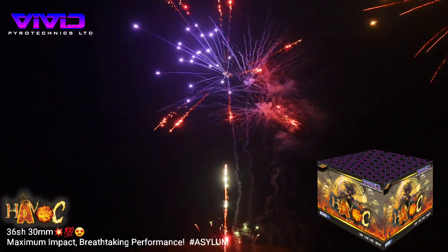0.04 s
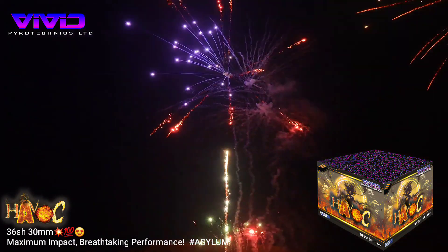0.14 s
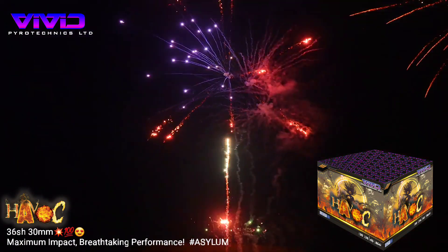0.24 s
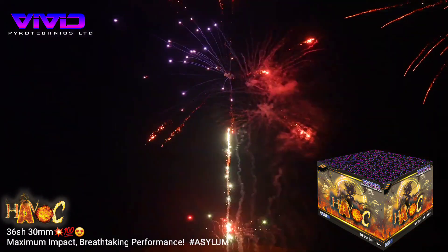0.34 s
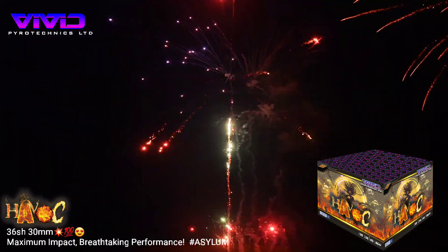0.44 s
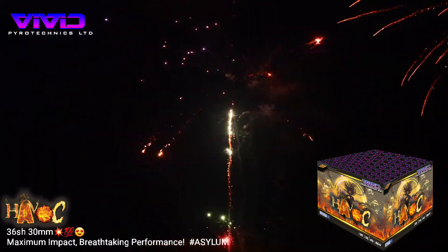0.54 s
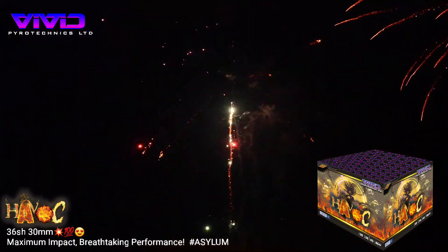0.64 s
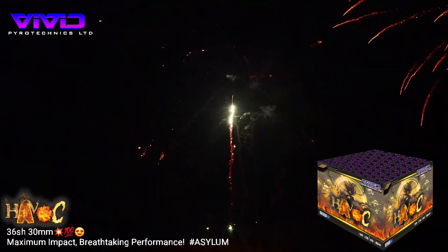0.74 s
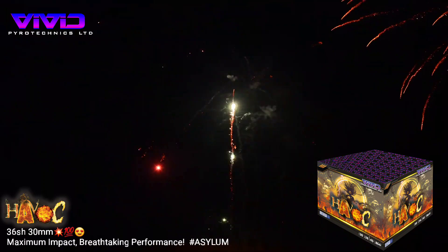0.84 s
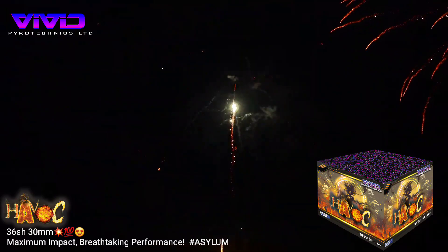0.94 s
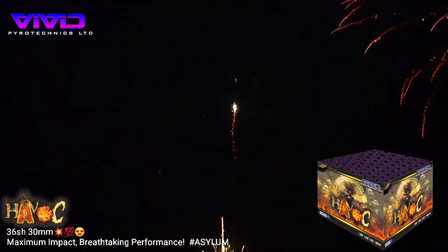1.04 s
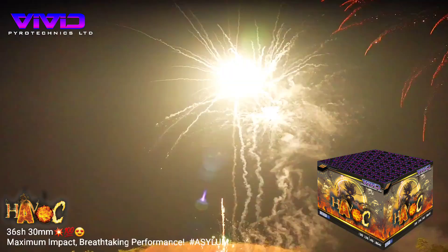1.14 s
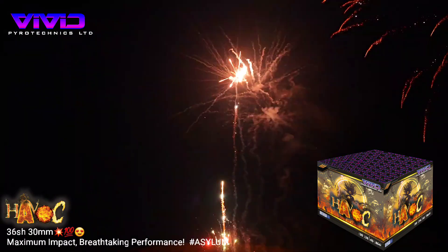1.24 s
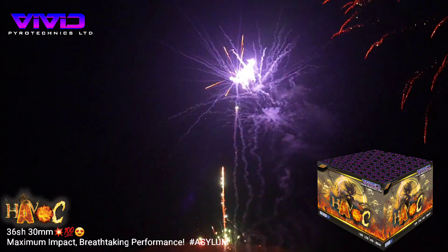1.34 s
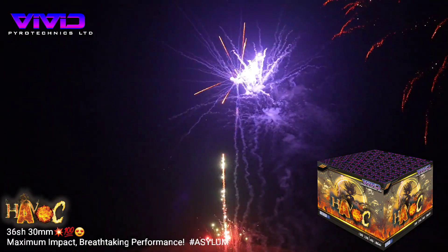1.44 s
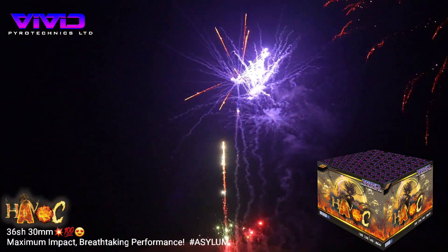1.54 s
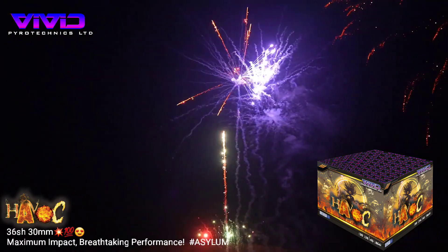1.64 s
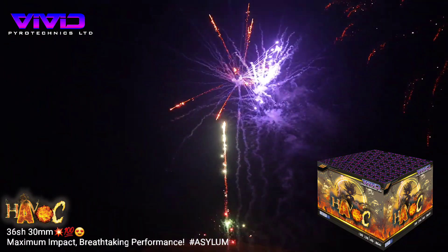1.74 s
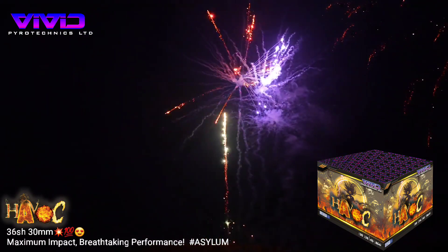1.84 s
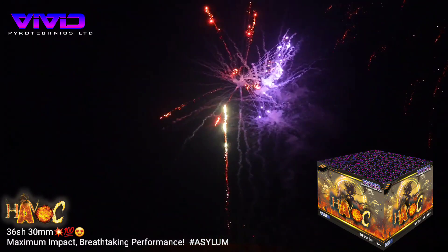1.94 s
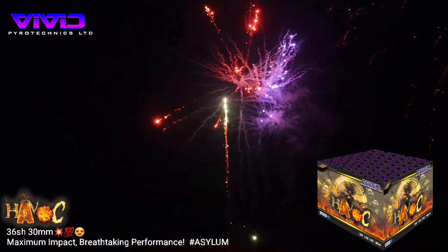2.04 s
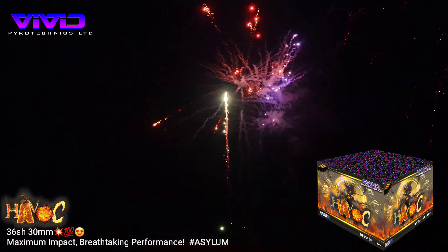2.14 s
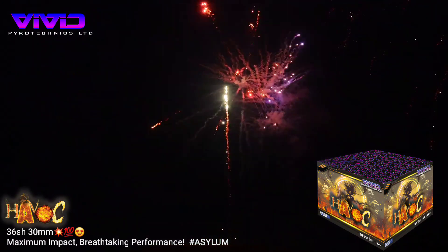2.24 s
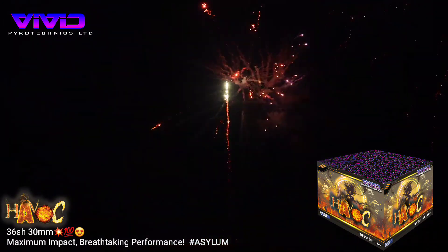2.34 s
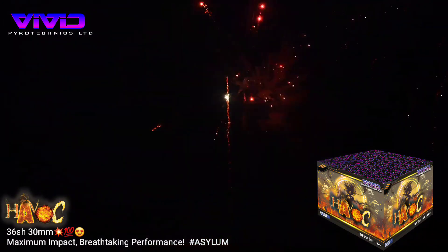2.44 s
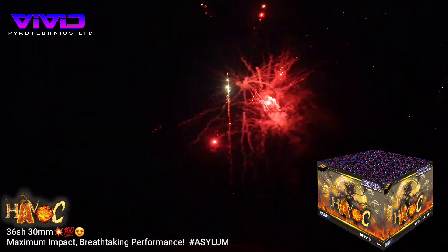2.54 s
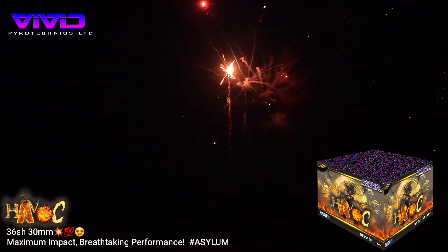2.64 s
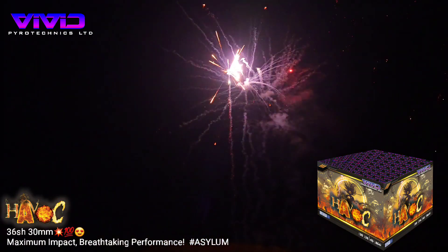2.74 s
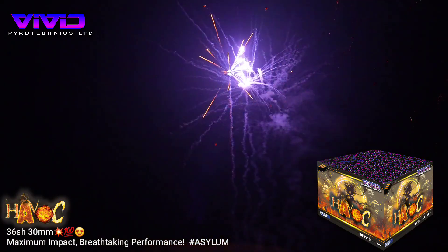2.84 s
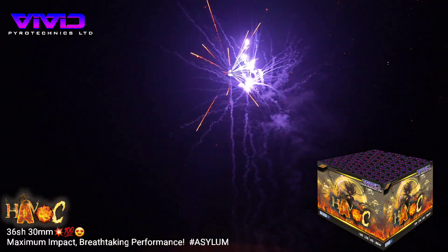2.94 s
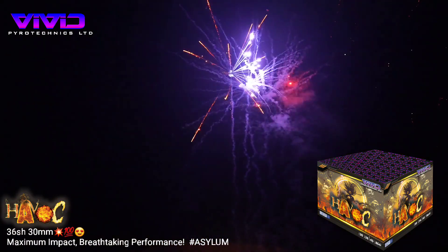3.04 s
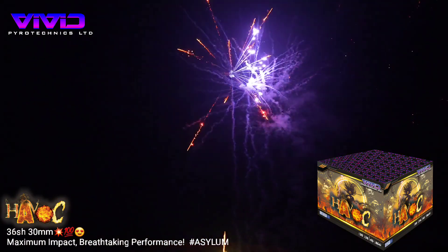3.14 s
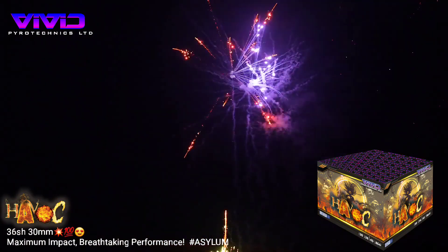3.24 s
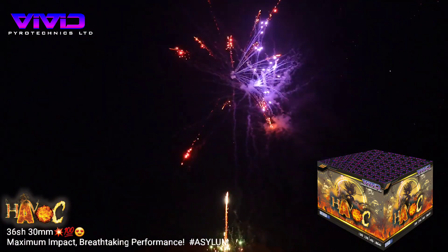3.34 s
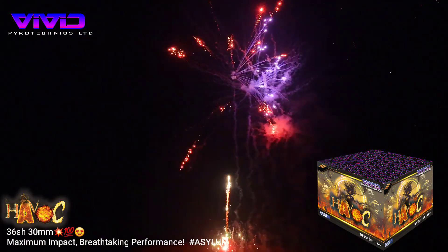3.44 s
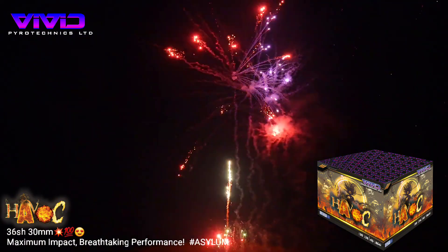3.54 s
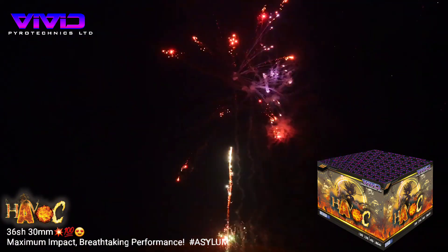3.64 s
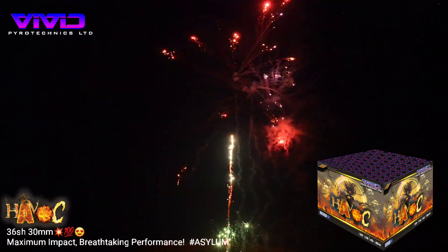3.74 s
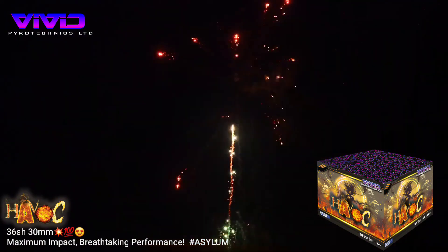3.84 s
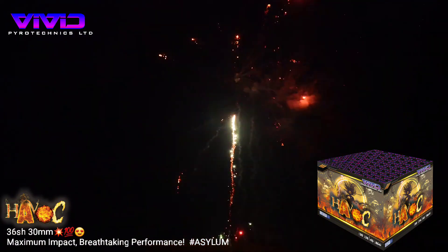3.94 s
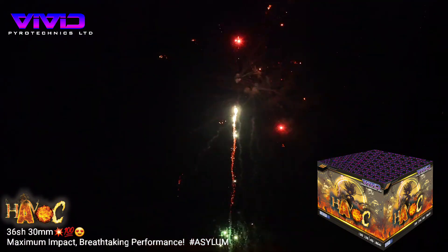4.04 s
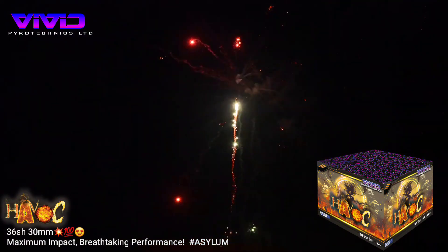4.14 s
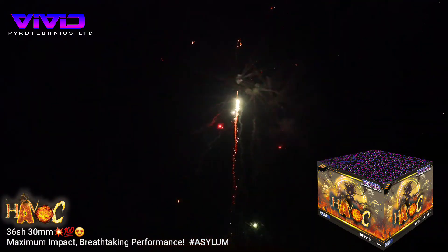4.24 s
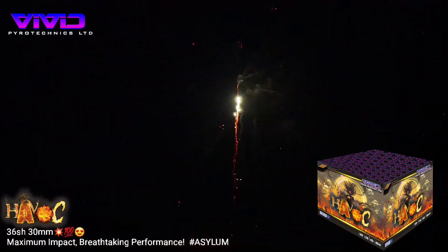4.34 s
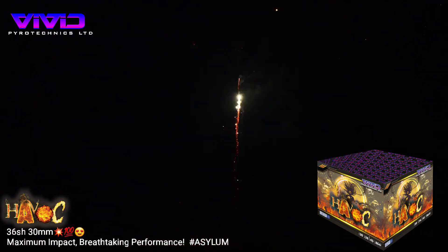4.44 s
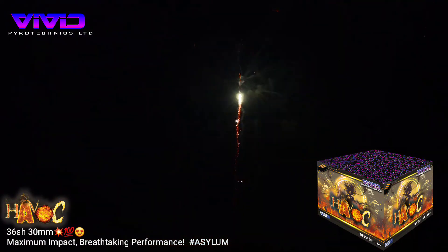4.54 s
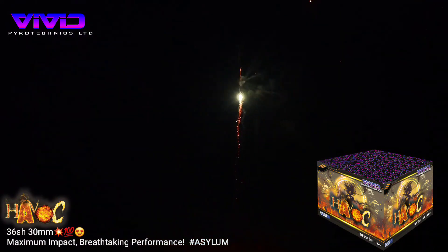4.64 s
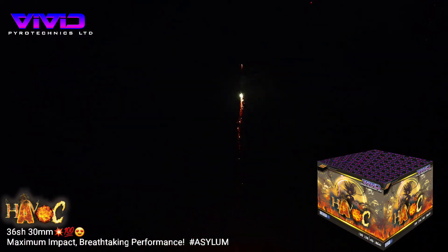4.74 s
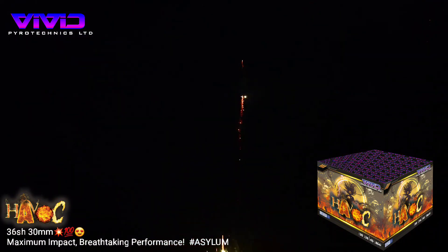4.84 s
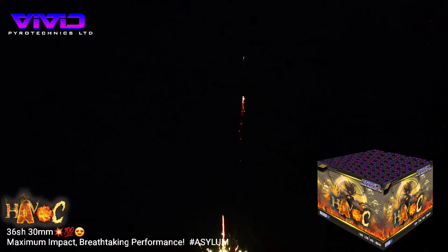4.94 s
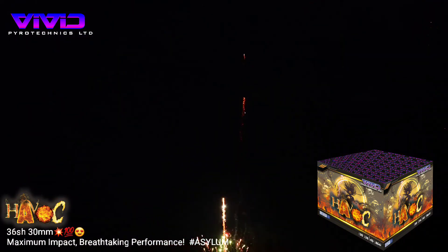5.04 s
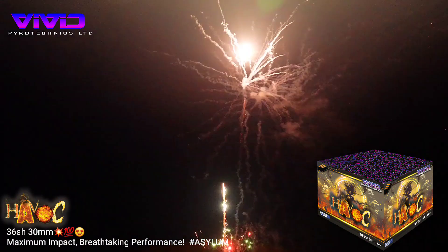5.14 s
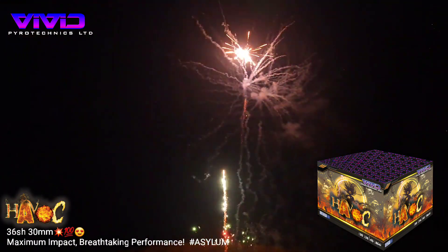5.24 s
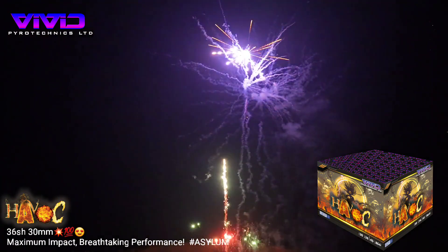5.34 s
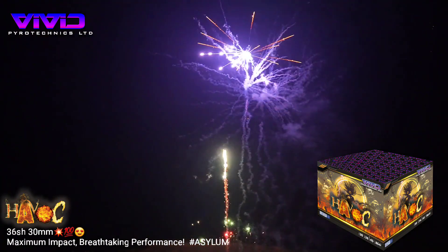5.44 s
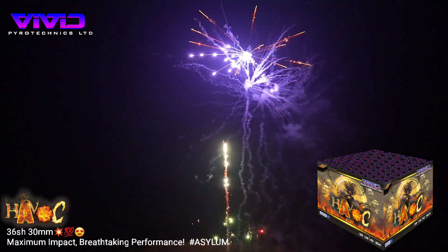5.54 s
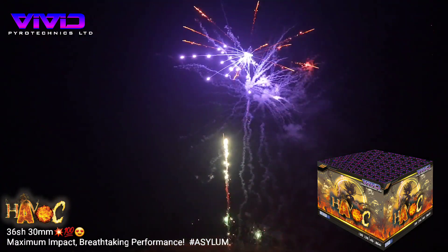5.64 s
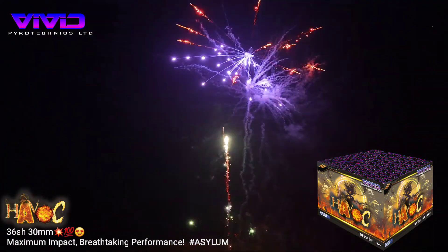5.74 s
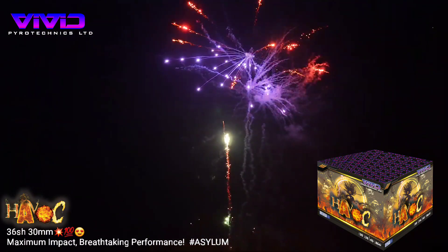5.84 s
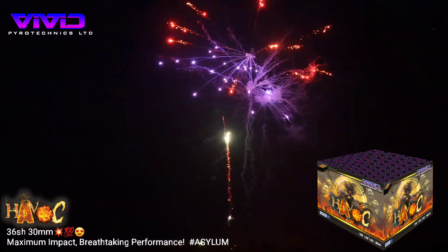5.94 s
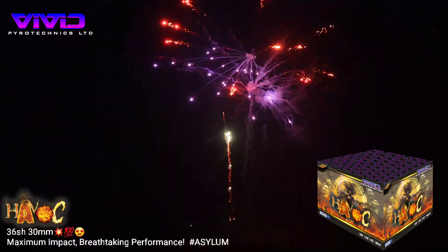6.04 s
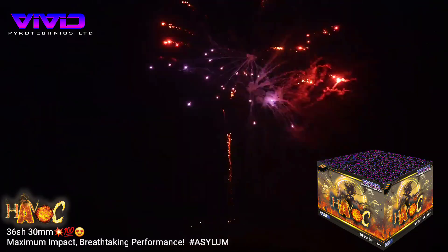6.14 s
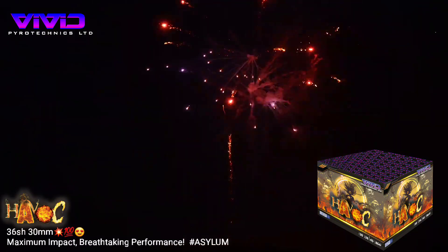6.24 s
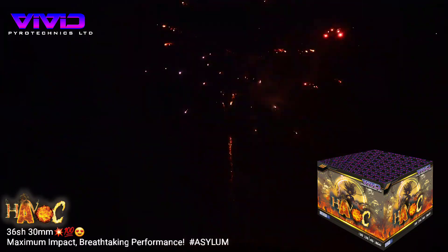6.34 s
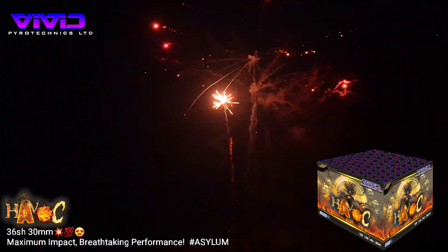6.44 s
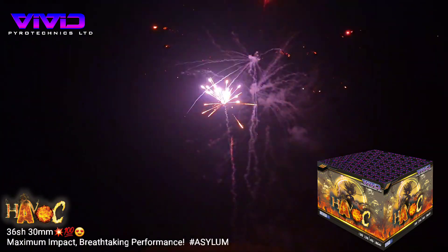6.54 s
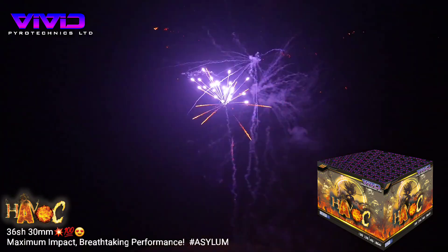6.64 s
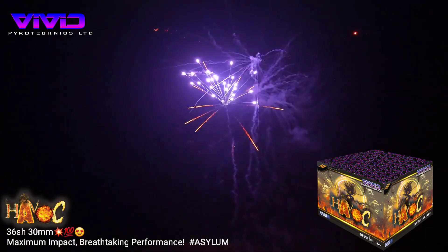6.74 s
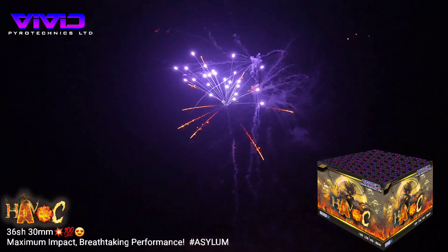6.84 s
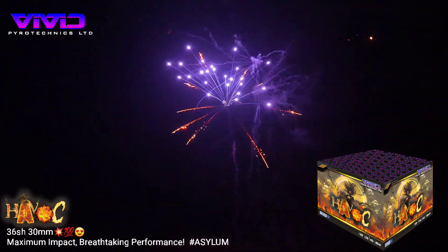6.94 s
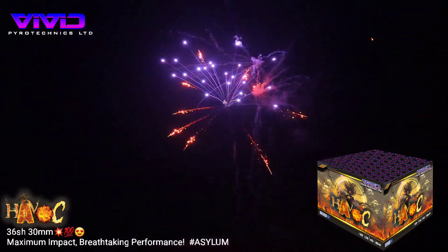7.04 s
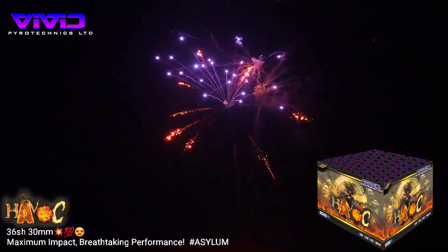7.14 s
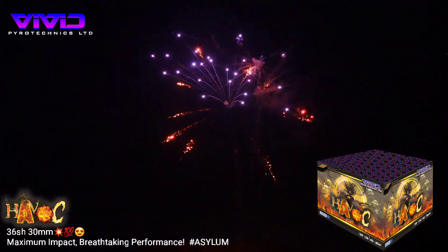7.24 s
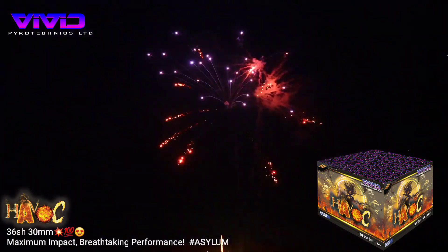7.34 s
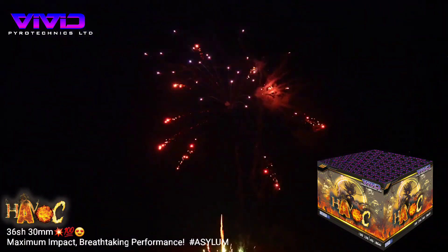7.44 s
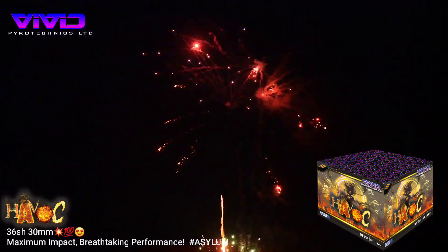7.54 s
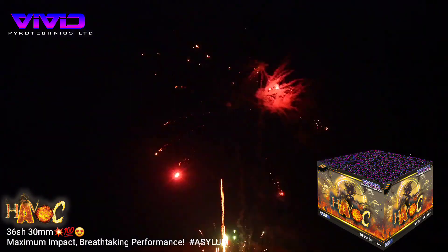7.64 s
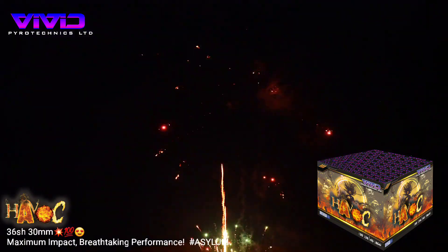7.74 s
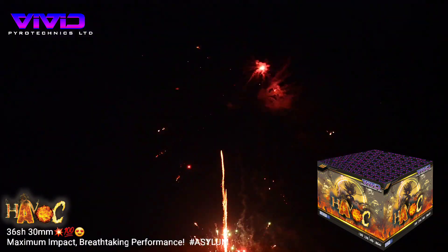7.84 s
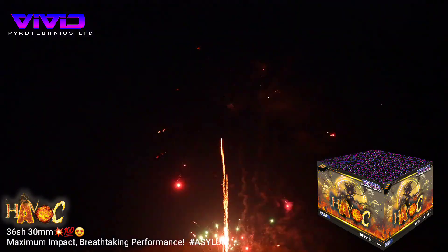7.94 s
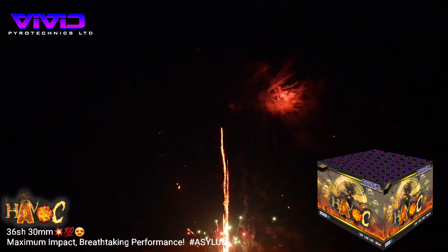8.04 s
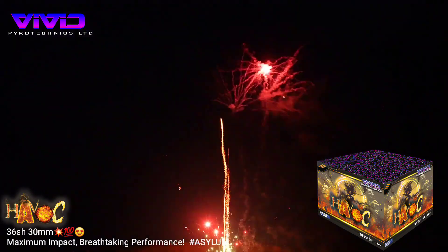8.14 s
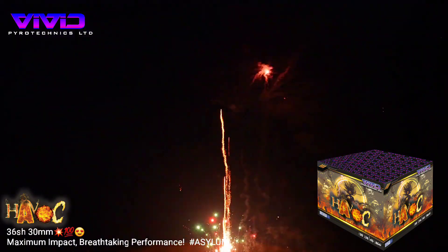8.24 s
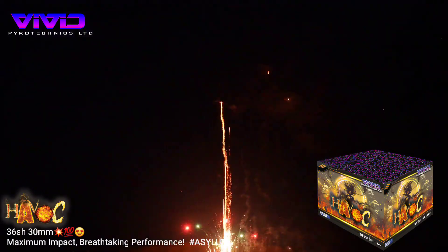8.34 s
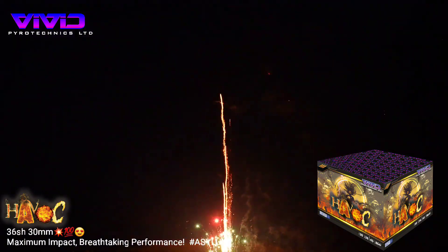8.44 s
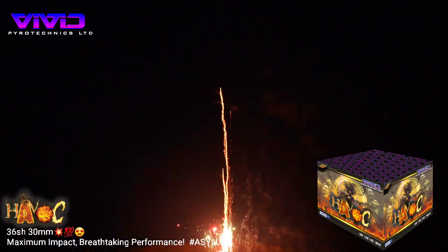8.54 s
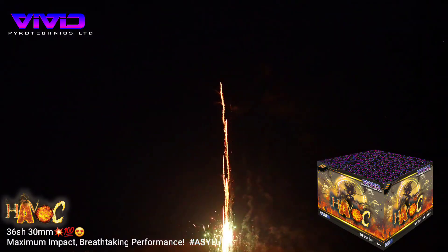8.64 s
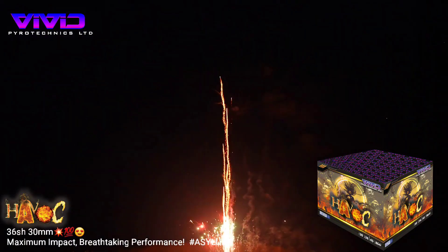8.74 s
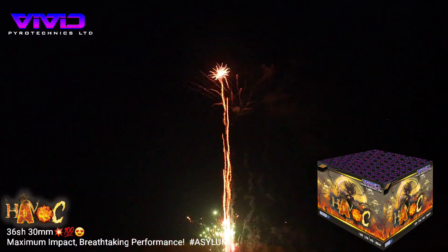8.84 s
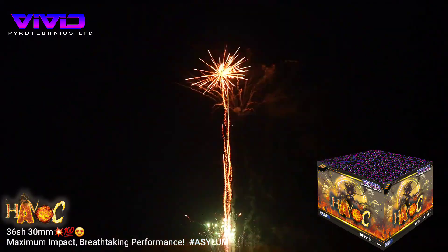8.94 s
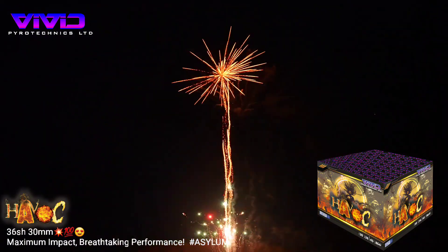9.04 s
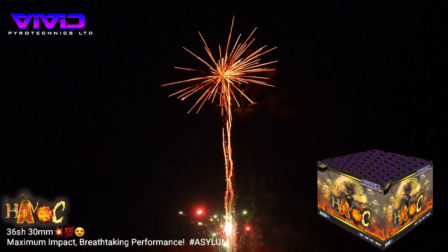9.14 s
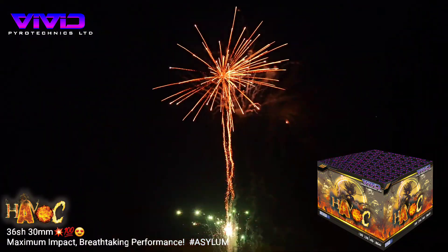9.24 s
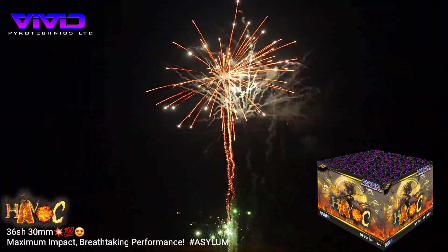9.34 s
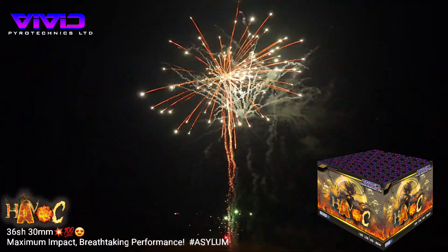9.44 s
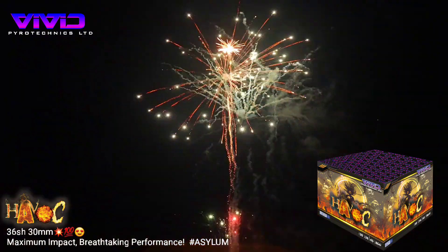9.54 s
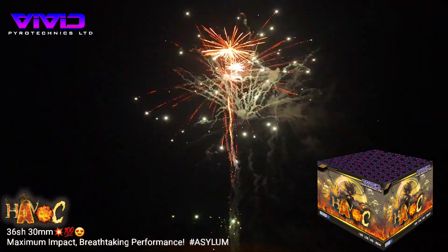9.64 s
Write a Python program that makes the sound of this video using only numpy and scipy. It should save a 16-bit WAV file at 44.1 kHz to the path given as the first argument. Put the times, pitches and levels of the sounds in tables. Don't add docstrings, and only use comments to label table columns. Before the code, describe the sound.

Firework shots thump from the ground and burst overhead at night, each sharp bang slapping off walls and rolling away in a hissing wash.

```python
import sys
import numpy as np
from scipy import signal
from scipy.io import wavfile

SR = 44100
rng = np.random.default_rng(int(sys.argv[2]) if len(sys.argv) > 2 else 0)


def int16_out(signal):
    q = np.round(np.clip(np.atleast_2d(signal).T, -1, 1) * 32767)
    wavfile.write(sys.argv[1], SR, q.astype(np.int16))


def nominal_scale(level):
    x = np.asarray(level, float) / 20
    return 10 ** x


N = 427329

# [t/s, bang/dB, wash/dB, ring/dB, big wall lag/ms]
BURSTS = [
    (1.5615, 3.5, 0.5, -15, 167),
    (3.0047, 1, 0, -10.5, 168),
    (5.5481, 2.5, 1, -10, 172),
    (6.7875, 3, 1.5, -10.5, 151.5),
    (9.2244, 2.5, 0, -11, 164),
]
# [t/s, bang/dB, wash/dB, ring/dB, thump/dB]
LIFTS = [
    (1.0512, 1.5, 1.5, 1.5, -13),
    (3.2239, 2, -1, -2, -11),
    (4.9398, -2.5, -1.5, 0.5, -17),
    (7.44565, 4.5, 3, -6.5, -6.5),
    (7.6926, 3.5, 0.5, -2.5, -5.5),
    (8.0316, 3, -0.5, -1, -11),
    (8.2532, 4, 0.5, -3, -16),
    (8.434, 4.5, 0.5, -5.5, -10),
    (8.6287, 3.5, 0.5, -7, -12),
]
# t/s, bang/dB, wash/dB
ALL_BURSTS = [(-0.18, 0, 5.44), *BURSTS]
ALL_LIFTS = [(-0.0024, 16, -23), *LIFTS]

STEP = 32
T = np.arange(N // STEP + 2) * STEP / SR
EDGES_HZ = 45 * 2 ** np.arange(0, 8.7, 1 / 3)
BAND_HZ = np.sqrt(EDGES_HZ[:-1] * EDGES_HZ[1:])
TOP_HZ = 15700


def at_hz(points, hz):
    points_hz, db = np.transpose(points)
    return np.interp(np.log(hz), np.log(points_hz), db)


def band_power(points):
    return nominal_scale(2 * at_hz(points, BAND_HZ))[:, None]


def butter(order, hz, kind, sound):
    return signal.sosfilt(signal.butter(order, hz, kind, fs=SR, output="sos"), sound)


def add(track, s, sound, db, pan_db=0, lag=0):
    for side, sign in ((0, 0.63), (1, -2.6)):
        i = round(s * SR) + lag * (1 - side)
        if 0 <= i < N:
            track[side, i:i + len(sound)] += nominal_scale(db + sign * pan_db / 2) * sound[:N - i]


def shock(ring_hz, ring_db, thump_db, hold_ms, near_db, over_db):
    # [f/Hz, level/dB, decay/s]
    overtones = [(1445, -8.5, 0.012), (2220, -13, 0.0082), (583, -10.5, 0.006)]
    t = np.arange(600) / SR
    draw = rng.random((3, 6))
    suction = np.exp(-((t - 2.6e-4) / 0.00013) ** 2)
    front = 2.34 * np.exp(-t / 9e-5) - suction
    near = np.zeros(len(t))
    near_s = .0008 + .0022 * draw[0] ** 2
    near[(SR * near_s).astype(int)] = nominal_scale(near_db - 16.0 * draw[1])
    near[0] = 1
    ring = -nominal_scale(ring_db) * np.sin(2 * np.pi * ring_hz * t) * np.exp(-t / 0.0076)
    for (hz, db, decay_s), chance in zip(overtones, draw[2]):
        mode_hz = hz * (0.975 + 0.061 * chance)
        ring = ring - nominal_scale(db + over_db) * np.sin(2 * np.pi * mode_hz * t) * np.exp(-t / decay_s)
    thump = nominal_scale(thump_db) * np.sin(2 * np.pi * 260 * t - .6) * np.exp(-t / 0.0017)
    grit = nominal_scale(near_db / 2 - 11) * rng.standard_normal(len(t)) * (t > 4e-4) * np.exp(-t / .003)
    shut = nominal_scale(-16 / (1 + np.exp(-(t - hold_ms / 1000) / 0.00025)) - 500 * t)
    pulse = 0.27 * (np.convolve(near, front)[:len(t)] + ring + thump + grit) * shut
    return signal.lfilter([.35, .15], [1, -.5], pulse) * 1.05


def cluster(length_ms, top_hz, per_s):
    # [f/Hz, width/Hz, level/dB]
    port = [(245, 100, -6.5), (557, 96, 4), (1070, 160, 0.5), (1970, 1500, -3)]
    t = np.arange(4000) / SR * 1000 / length_ms
    draw = rng.random((3, len(t)))
    clicks = (draw[0] < per_s / SR) * np.sign(draw[1] - .5) * nominal_scale(-12 * draw[2])
    clicks[0] = 0.61
    clicks = clicks * np.minimum(0.79 + t * 5, 1) * np.exp(-t ** 3)
    sound = butter(1, 200, "high", clicks)
    for hz, width_hz, db in port:
        r, w = np.exp(-np.pi * width_hz / SR), 2 * np.pi * hz / SR
        ringing = signal.lfilter([1 - r, 0, r - 1], [1, -2 * r * np.cos(w), r * r], clicks)
        sound = sound + nominal_scale(db) * ringing
    sound = butter(3, min(top_hz, 15000), "low", sound)
    return sound / np.sqrt(np.sum(sound ** 2) / (length_ms * SR / 1000)) * 0.26


def burst_bangs():
    out = np.zeros((2, N))
    for s, db, _, ring_db, wall_ms in BURSTS:
        bang = shock(1020, ring_db, -8, hold_ms=5.4, near_db=-6.5, over_db=-4.5)
        add(out, s, bang, db, -1.5)
        ground = shock(800, -9, -12, hold_ms=2.8, near_db=-9, over_db=-9)
        add(out, s + 0.0248 * wall_ms / 1000, ground, db - 3.5, 1.5)
    return out


def lift_bangs():
    fence_s, fence_db, fence_pan_db = .5835, -8.5, 13
    out = np.zeros((2, N))
    for s, db, _, ring_db, thump_db in LIFTS:
        ring_hz = 1067 * (1 + 0.023 * rng.standard_normal())
        bang = shock(ring_hz, ring_db, thump_db, hold_ms=5.2, near_db=-8, over_db=-4.0 - 0.14 * ring_db)
        add(out, s, bang, db, -.4)
        far = shock(1150, -2, -18, hold_ms=1.1, near_db=-30, over_db=-12)
        far = signal.lfilter([.055], [1, -1.45, .58], far)
        add(out, s + fence_s, far, fence_db, fence_pan_db)
        add(out, s + fence_s + .0098, far, fence_db - 15, fence_pan_db)
        slats = cluster(16, 1500, per_s=2500)
        add(out, s + fence_s + .002, slats, fence_db - 31, fence_pan_db / 2)
    return out


def stray_cracks():
    # [t/s, level/dB, left-right/dB]
    cracks = [(4.9367, -5, 5)]
    out = np.zeros((2, N))
    for s, db, pan_db in cracks:
        crack = shock(1450, -7, -11, hold_ms=0.91, near_db=-30, over_db=-19)
        add(out, s, -signal.lfilter([.3], [1, -.7], crack), db, pan_db)
    return out


def add_far(track, s, db, pan_db, length_ms, top_hz, per_s):
    add(track, s, cluster(length_ms, top_hz, per_s), db, pan_db, lag=8 * (pan_db < -1))


def burst_slaps():
    # [lag/s, level/dB, left-right/dB, length/ms, top/Hz]
    buildings = [(0.449, -34, -2.5, 13, 1273), (.534, -32, 15, 22.6, 1740), (.563, -23, 9, 12.6, 1390),
                 (.586, -32.5, 13, 19, 1560), (.625, -31, 14, 8, 1300), (.655, -32, 5, 4.7, 700),
                 (.778, -29.5, -5.5, 14, 2090), (0.861, -38.5, -2, 6.3, 1110), (.922, -30.5, 7, 11, 1400),
                 (1.396, -54, -0.5, 15, 12000)]
    # [from left/ms, from right/ms]
    shell_drift = [(1.5, -1), (-2.5, 7), (0.2, -11), (-8, 0.5), (0.1, -1.5)]
    out = np.zeros((2, N))
    for (s, _, wash_db, _, wall_ms), (left_ms, right_ms) in zip(BURSTS, shell_drift):
        wall_s = wall_ms / 1000
        walls = [(wall_s, -16.5, 10.7, 830),
                 (wall_s + .005, -11, 34, 4000),
                 (.041, -17, 12, 1600)]
        for lag_s, db, length_ms, top_hz in walls:
            add(out, s + lag_s, cluster(length_ms, top_hz, per_s=3500), db + 4.0)
        for lag_s, db, pan_db, length_ms, top_hz in buildings:
            shift_ms = right_ms if pan_db < -1 else left_ms
            add_far(out, s + lag_s + shift_ms / 1000, db + wash_db, pan_db, length_ms, top_hz, per_s=2500)
    return out


def lift_slaps():
    shed, hedge = (0.02, -26, 26, 730), (0.4, -50, 40, 2400)   # lag/s, level/dB, length/ms, top/Hz
    out = np.zeros((2, N))
    for s, _, wash_db, *_ in LIFTS:
        for lag_s, db, length_ms, top_hz in (shed, hedge):
            add(out, s + lag_s, cluster(length_ms, top_hz, per_s=3300), db + wash_db)
    return out


def earlier_slaps():
    # [t/s, level/dB, left-right/dB, length/ms, top/Hz]
    echoes = [(0, -18.5, 1.5, 10, 2460), (.039, -19, -1, 11, 584), (.052, -19, 0.5, 73, 3500),
              (.057, -15.5, -0.5, 8.4, 695), (0.283, -27.5, 0, 17, 900), (.307, -26, 4, 7.2, 900),
              (0.346, -25.5, 6, 20, 1400), (0.422, -20.5, -5, 10, 1790), (0.842, -33.5, 10, 16, 5000)]
    out = np.zeros((2, N))
    for s, db, pan_db, length_ms, top_hz in echoes:
        add_far(out, s, db + 2, pan_db, length_ms, top_hz, per_s=4000)
    return out


def wash_power(shots, belts):
    rise_db = 19.5
    since = T - np.array([row[0] for row in shots])[:, None]
    wash_db = np.array([row[2] for row in shots])[:, None]
    powers = []
    for near_s, far_s, db, fade_db_s, *_ in belts:
        swell_db = rise_db * np.maximum(1 - since / near_s, 0)
        fade_db = fade_db_s * np.maximum(since - far_s, 0)
        powers.append((since > .006) * nominal_scale(2 * (db + wash_db - swell_db - fade_db)))
    return np.array(powers)


def belt_wash(shots, belts):
    knee_hz, bass_hz, bass_db_oct = 926, 460, 6
    hz = BAND_HZ[:, None]
    treble_db = np.array([row[4] for row in belts]) * np.maximum(np.log2(hz / knee_hz), 0)
    bass_db = bass_db_oct * np.maximum(np.log2(bass_hz / hz), 0)
    return nominal_scale(2 * (treble_db - bass_db)) @ wash_power(shots, belts).sum(axis=1)


def since_burst():
    starts = np.array([row[0] for row in ALL_BURSTS])
    return T - starts[np.searchsorted(starts, T) - 1]


def wash_side():
    # [time after burst/s, left-right/dB, tree share/0-1]
    after_s, pan_db, share = np.transpose([(0, 2.5, 0.1), (.2, -2, 0.03), (.35, -0.5, 0.2), (.5, -5, 0.4),
                                           (.58, -1.5, 0), (.7, -2.5, 0.06), (.85, -6, 0.67),
                                           (1.2, -3.5, 0.17), (1.6, -2, 0.23)])
    since = since_burst()
    return np.interp(since, after_s, pan_db), np.clip(np.interp(since, after_s, share), 0, 1)


def burst_wash(pan_db):
    # [near edge/s, far edge/s, level/(dB per Hz), fade/(dB/s), treble/(dB/octave)]
    belts = [(.045, 0.105, -55.5, 151, -3), (.075, 0.091, -62.5, 197, 0.4), (.2, .27, -66.5, 92, -2.5),
             (.55, 0.86, -78, 28.5, -5.5)]
    # [f/Hz, level/dB]
    far_colour = [(100, -0.5), (300, 0), (1000, 0.5), (1900, 4.5), (2500, 1), (3200, 0), (5500, 0.5),
                  (12000, -6.5)]
    late = np.clip(since_burst() / 0.4, 0, 1)
    mono = belt_wash(ALL_BURSTS, belts) * band_power(far_colour) ** late
    return mono * nominal_scale(np.array([pan_db, -pan_db]))[:, None]


def lift_wash():
    # [near edge/s, far edge/s, level/(dB per Hz), fade/(dB/s), treble/(dB/octave)]
    belts = [(0.025, 0.036, -62, 114, -6.5), (0.068, 0.092, -68.5, 82, -1.5), (.19, .21, -73, 141, -12),
             (0.294, 0.315, -87, 75, -8.5), (0.52, 0.648, -87.5, 44, -4.5)]
    # [f/Hz, level/dB]
    lift_colour = [(100, 3), (400, -3.5), (700, -0.5), (1250, -0.5), (1800, -0.5), (2500, 1), (4000, -1),
                   (12000, -5)]
    return belt_wash(ALL_LIFTS, belts) * band_power(lift_colour)


def rumble_and_hiss():
    # [start/s, end/s, level/dB, fade/(dB/s)]
    burst_rumble, burst_hiss = [(.05, .29, -73.5, 122), (.56, .62, -77, 49), (.8, .9, -85.5, 39.5)], [(.4, .85, -99, 33)]
    lift_rumble, lift_hiss = [(.045, 0.197, -85, 109)], [(0.04, 0.084, -84.5, 70)]
    # [f/Hz, level/(dB per Hz)]
    rumble_colour, hiss_colour = [(40, -13), (100, -4.5), (200, 3), (330, 6), (500, -10.5), (1000, -37.5)], [(1000, -34), (3000, 6.5), (5500, 10), (9000, 3),
                                                  (13000, -21), (16000, -8.5)]
    rumble = wash_power(ALL_BURSTS, burst_rumble).sum(axis=(0, 1))
    rumble = rumble + wash_power(ALL_LIFTS, lift_rumble).sum(axis=(0, 1))
    hiss = wash_power(ALL_BURSTS, burst_hiss).sum(axis=(0, 1))
    hiss = hiss + wash_power(ALL_LIFTS, lift_hiss).sum(axis=(0, 1))
    hiss = hiss * nominal_scale(2 * -5.5 * (T < BURSTS[0][0]))
    return rumble * band_power(rumble_colour) + hiss * band_power(hiss_colour)


def climb_rush():
    # [start/s, end/s, level/(dB per Hz), fade/(dB/s), centre/Hz]
    rush = [(0.057, 0.138, -64, 184, 1250), (0.147, 0.199, -66.5, 350, 2370)]
    octaves = np.log2(BAND_HZ[:, None] / np.array(rush)[:, 4])
    return np.exp(-(octaves / .3) ** 2) @ wash_power(ALL_LIFTS, rush).sum(axis=1)


def comet_fizz():
    # [start/s, end/s, level/dB, fade/(dB/s)]
    (start_s, end_s, db, fade_db_s), = [(3.95, 4.42, -104, 90)]
    # [f/Hz, level/dB]
    comet_colour = [(1000, -1), (3000, 7), (8000, 0.5), (14000, -1.5)]
    swell_db = 34.0 * np.maximum(start_s - T, 0)
    fade_db = fade_db_s * np.maximum(T - end_s, 0)
    return nominal_scale(2 * (db - swell_db - fade_db)) * band_power(comet_colour)


def night_noise():
    # [f/Hz, level/(dB per Hz)]
    night = [(50, -115), (150, -100), (370, -101), (550, -88.5), (720, -99.5), (1050, -92), (1400, -91.5),
             (2400, -101), (4000, -114), (7000, -122), (15000, -135)]
    return band_power(night) * nominal_scale(2 * np.array([1.5, -1.5]))[:, None, None]


def duck():
    duck_db, duck_s = 5.5, 0.074
    total_db = 0
    for s, bang_db, *_ in ALL_BURSTS + ALL_LIFTS:
        recovery = (T > s) * np.exp(-np.maximum(T - s, 0) / duck_s)
        total_db = total_db - (duck_db + 0.18 * bang_db) * recovery
    return nominal_scale(total_db)


def drift(rate_hz, count):
    r = np.exp(-2 * np.pi * rate_hz * STEP / SR)
    white = rng.standard_normal((count, N // STEP + 502))
    slow = signal.lfilter([1], [1, -2 * r, r * r], white)[:, 500:]
    return slow / slow.std(axis=1, keepdims=True)


def lumps():
    depth_db = at_hz([(200, 2.2), (1000, 1.3), (4000, .8)], BAND_HZ)[:, None]
    own, shared = drift(45.0, len(BAND_HZ)), drift(35.0, 1)
    return nominal_scale(2 * depth_db * (.8 * shared + .5 * own))


def grain():
    grain_db, grain_s = 2.4, .0008
    spikes = np.interp(np.arange(N) / SR, np.arange(20000) * grain_s, rng.exponential(1, 20000))
    gain = nominal_scale(grain_db * np.minimum(spikes, 5))
    return gain / np.sqrt(np.mean(gain ** 2))


def wash():
    # [f/Hz, level/dB]
    colour = [(50, -9), (110, -6.5), (230, -1.5), (380, -8), (540, 3), (760, -3), (1050, 3), (1500, 1),
              (2300, 1.5), (3000, 0.5), (5000, 1), (9500, 2), (12000, -8), (15500, -5.5)]
    # [f/Hz, correlation]
    likeness = [(60, .99), (150, 1), (290, 0.98), (640, 0.67), (1400, 0.19), (3000, .0), (15000, 0.077)]
    pan_db, tree_share = wash_side()
    echoes = (burst_wash(pan_db) + lift_wash()) * band_power(colour)
    steady = rumble_and_hiss() + climb_rush() + comet_fizz()
    gains = duck() * np.sqrt((echoes + steady) * lumps() + night_noise())
    white = rng.standard_normal((2, 3, N))
    grainy = white * grain()
    fine = np.arange(N) / STEP
    steps = np.arange(len(T))
    tree_share = np.interp(fine, steps, tree_share)
    alikes = np.clip(at_hz(likeness, BAND_HZ), -1, 1)
    out = np.zeros((2, N))
    for k, (hz, alike) in enumerate(zip(BAND_HZ, alikes)):
        noise = (grainy if hz < 4000 else white)[k % 2]
        mid, side, trees = butter(2, EDGES_HZ[k:k + 2], "band", noise)
        diffuse = np.sqrt(.5 + alike / 2) * mid + np.sqrt(.5 - alike / 2) * side * [[1], [-1]]
        share = tree_share * (hz > 500)
        from_right = np.array([np.roll(trees, 8), trees])
        both = np.sqrt(1 - share) * diffuse + np.sqrt(share) * from_right
        out += both * [np.interp(fine, steps, gain) for gain in gains[:, k]]
    return out * np.sqrt(SR / 2)


def scene():
    bangs = burst_bangs() + lift_bangs() + stray_cracks()
    scattered = burst_slaps() + lift_slaps() + earlier_slaps() + wash()
    air = signal.cheby2(12, 40, TOP_HZ, fs=SR, output="sos")
    return signal.sosfilt(air, scattered) + butter(2, 110, "high", bangs)


def roll_off(x):
    return signal.sosfilt(signal.butter(12, 16670, fs=SR, output="sos"), x)


def record(dry):
    mid, side = (dry[0] + dry[1]) / 2, (dry[0] - dry[1]) / 2
    side = butter(1, 200, "high", side)
    thin = butter(2, 70, "high", [mid + side, mid - side])
    rounded = 1.3 * np.tanh(thin / 1.3)
    top_cut = signal.cheby2(10, 45, TOP_HZ + 900, fs=SR, output="sos")
    return roll_off(signal.sosfilt(top_cut, rounded))


dry = scene()
out = record(dry)
int16_out(out)
```